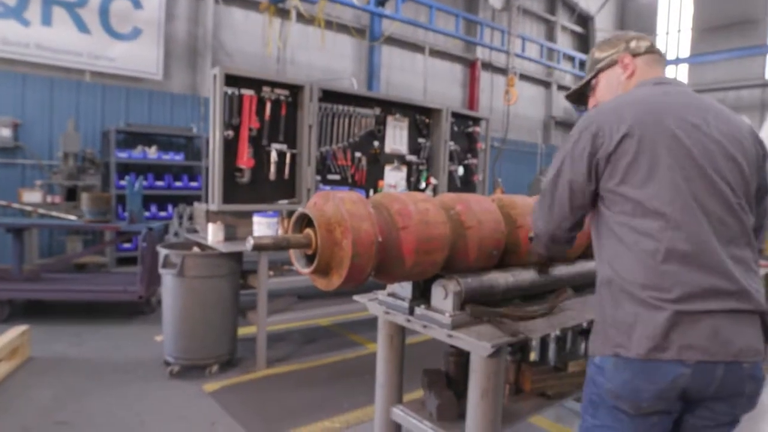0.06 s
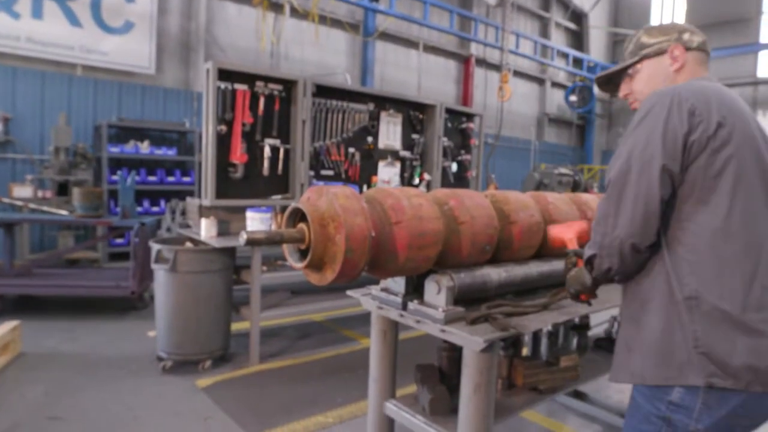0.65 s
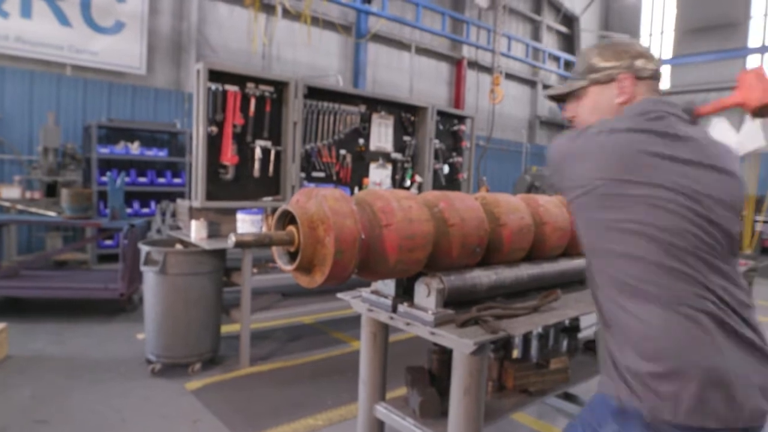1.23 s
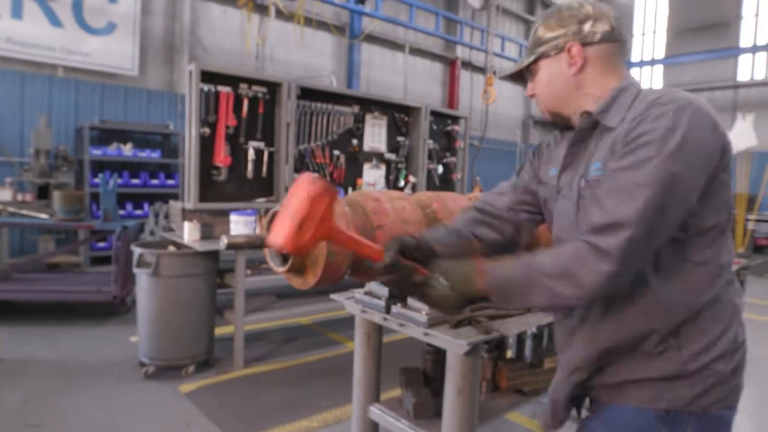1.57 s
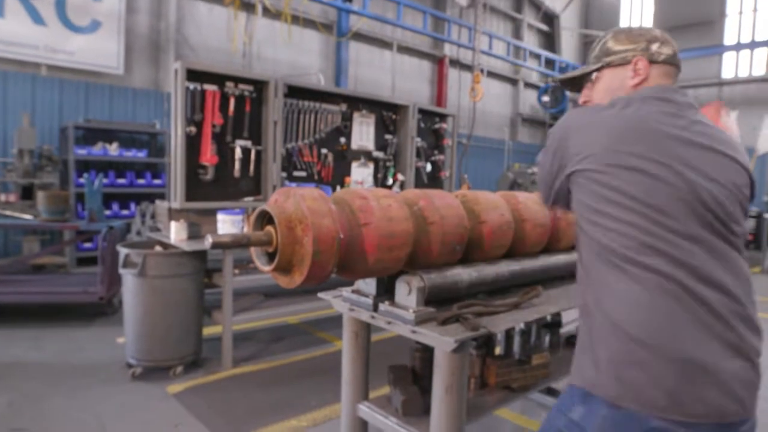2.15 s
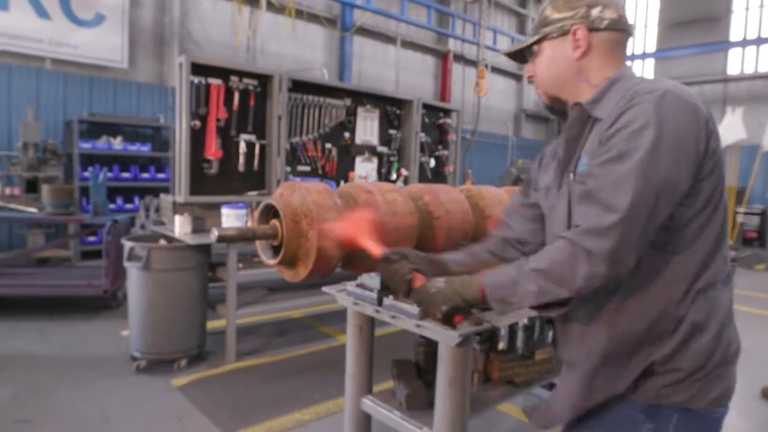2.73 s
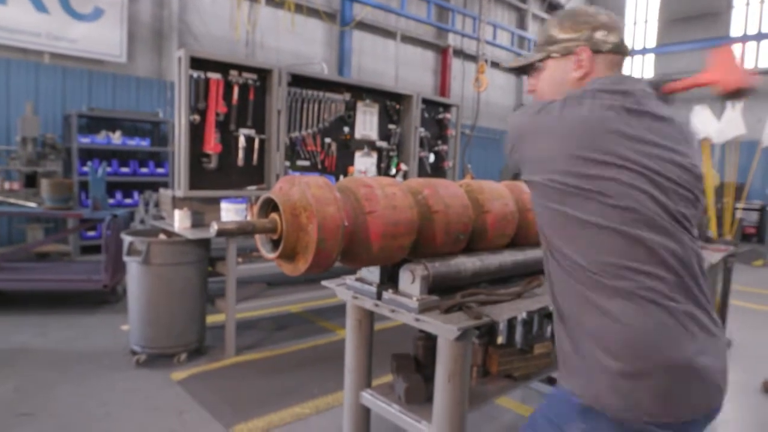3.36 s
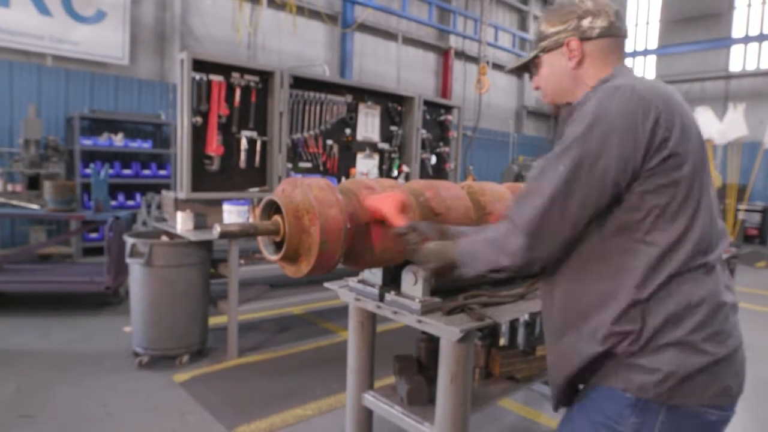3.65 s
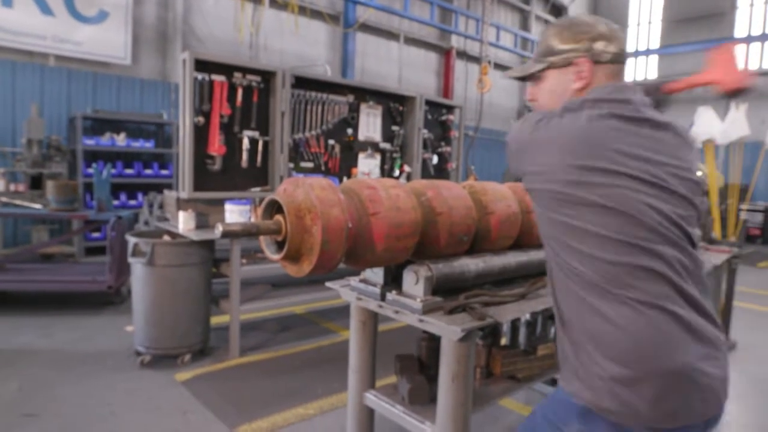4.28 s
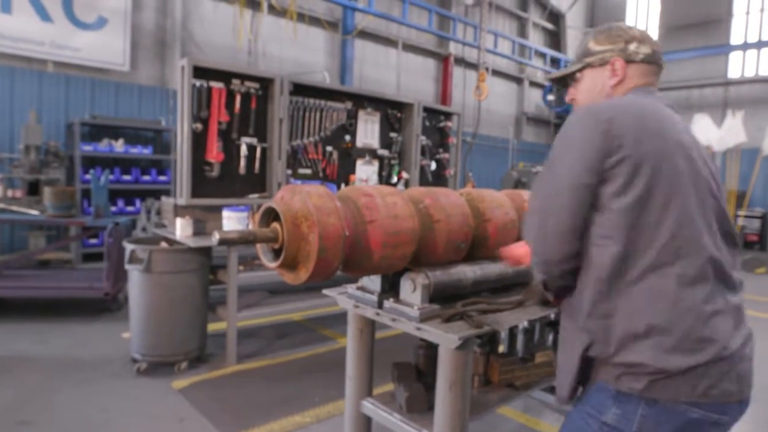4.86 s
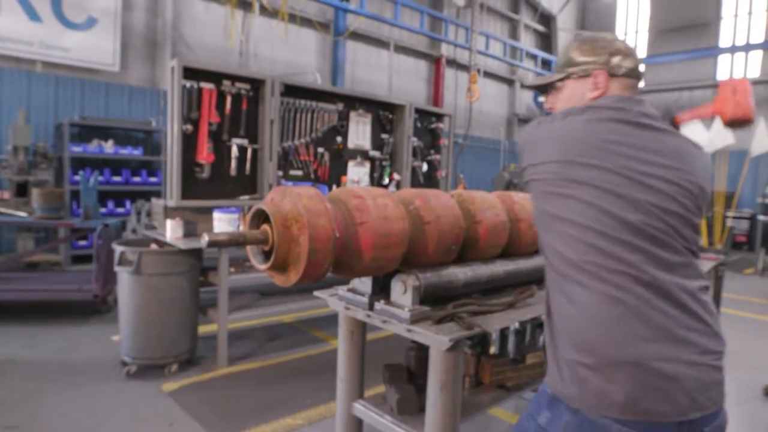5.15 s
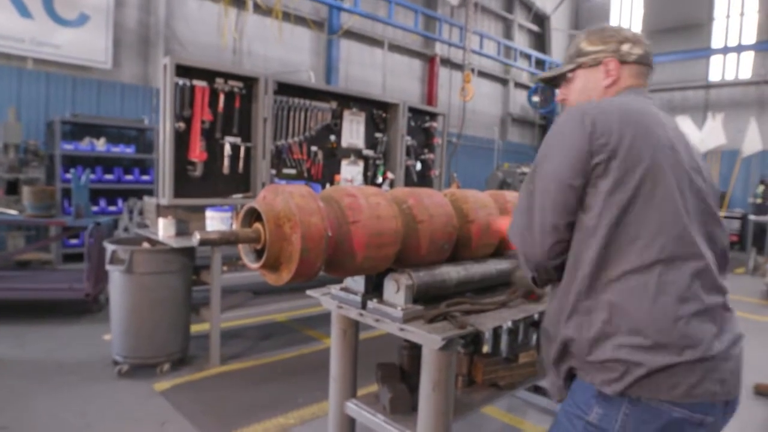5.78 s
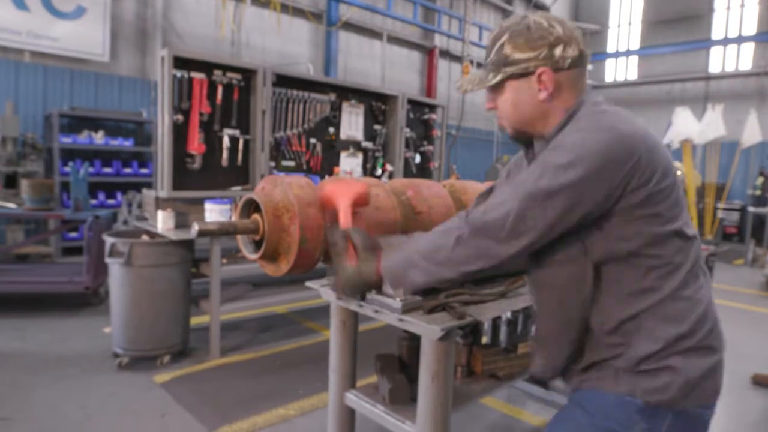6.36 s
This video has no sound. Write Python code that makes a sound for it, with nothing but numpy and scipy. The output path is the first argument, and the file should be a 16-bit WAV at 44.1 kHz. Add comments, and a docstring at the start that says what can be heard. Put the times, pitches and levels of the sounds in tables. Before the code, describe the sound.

A hammer strikes a heavy iron pump six times, sharp knocks with a brief ring, over a low ventilation hum in a large workshop.

```python
"""A dead-blow hammer strikes a long cast-iron pump six times in a large repair shop.
Each blow is a knock with a sharp crack; loose shot in the head drives a second contact a few ms later.
The casing rings briefly and the bench shudders. Bench, floor and tool wall scatter the sound,
the hall rings on, and ventilation hums underneath."""
import sys
import numpy as np
from scipy import signal
from scipy.fft import rfft, irfft, next_fast_len
from scipy.io import wavfile
from scipy.ndimage import map_coordinates

SR = 44100
rng = np.random.default_rng(int(sys.argv[2]) if len(sys.argv) > 2 else 0)


def file_out(sig):
    """Save sig as 16-bit WAV at sys.argv[1]."""
    # one column per channel
    cols = np.atleast_2d(sig).T
    # limit, then scale
    lim = np.clip(cols, -1, 1)
    pcm = np.round(lim * 32767).astype(np.int16)
    wavfile.write(sys.argv[1], SR, pcm)


N = 282681

# Contact crack and shot rattle. Each row: frequency in Hz, relative level in dB.
CRACK_SPECTRUM = [(400, -34), (1200, 2.5), (2400, 8), (3100, -2), (4000, -2), (5300, -0.5), (7200, -8),
                  (9300, -4), (12000, -12.5), (16000, -26)]


def hammer(push_db=-2, rattle_db=-22.5):
    """Six blows, each a push split over two contacts that excites casing, bench and room."""
    # Each row: start in seconds, force in dB, knock pitch in Hz, hardness in dB, head clack in dB,
    # lag of the second contact in seconds, its share of the push from 0 to 1.
    blows = [(1.458, -.3, 1040, 6, -4, .0057, 0.54), (2.5651, -.5, 1030, 0, -11, .0040, 0.73),
             (3.5647, 0.1, 550, -4, -17, .0052, 0.21), (4.4822, 1.5, 625, -2.5, -4.5, .0045, 0.17),
             (5.4475, -.4, 613, -3, -33, .0058, 0.23), (6.386, 1.5, 553, 1.5, -7.5, .0052, 0.19)]
    track = np.zeros(N)
    t = np.arange(SR * 3 // 2) / SR
    for start_s, force_db, knock_hz, hardness_db, clack_db, lag_s, share in blows:
        force = amp(force_db)
        first, second = force * amp(push_db) * np.array([1 - share, share])
        add(track, start_s, first * contact(t, knock_hz, hardness_db))
        clack = amp(clack_db) * knock(t, hz=1383, peak_cycles=0.74)  # hollow head
        add(track, start_s, force * clack)
        # The shot follows and drives the face on again.
        add(track, start_s + lag_s, second * contact(t, hz=678, hardness_db=hardness_db))
        add(track, start_s + lag_s, second * amp(rattle_db + hardness_db) * shot_rattle(t))
        add(track, start_s, force * casing(t))
        add(track, start_s + 0.0091, force * bench(t))  # the heavy pump is slow to rock it
        # Harder contact brightens the room.
        add(track, start_s, force * shop(t, tilt_db_per_oct=1 + 0.1 * hardness_db))
    return track


def contact(t, hz, hardness_db, crack_db=-12.5):
    """Face on iron: knock plus crack, both shorter at higher pitch. Harder contact cracks louder."""
    crack = swell(t, peak_s=0.44 / hz) * noise(CRACK_SPECTRUM, len(t))
    return knock(t, hz, peak_cycles=0.58) + amp(crack_db + hardness_db) * crack


def knock(t, hz, peak_cycles):
    """A push a few cycles long."""
    return swell(t, peak_cycles / hz) ** 2 * np.sin(2 * np.pi * hz * t)


def shot_rattle(t):
    """Loose shot settles in the head: a short noise burst."""
    return swell(t, peak_s=0.0032) * noise(CRACK_SPECTRUM, len(t))


def casing(t):
    """The cast-iron pump casing rings briefly."""
    # Each row: frequency in Hz, relative level in dB, T60 in seconds.
    casing_modes = [(243, -9, .2), (303, 2.5, .2), (495, -11, .3), (614, -7, .22), (923, -9, .17),
                    (1108, -13, .3), (1208, -7, .25), (1400, -14, .25), (1530, -12, .15), (1600, -17, .3),
                    (1890, -19, .22), (2488, -22, .3), (2611, -27, .35), (3010, -26, .3), (3156, -26, .35),
                    (3494, -27, .56), (3745, -26, .42)]
    return amp(-20) * ring(t, casing_modes, rise_s=0.0012, spread_db=2.0)


def bench(t):
    """The steel bench shudders under the pump."""
    # Each row: frequency in Hz, relative level in dB, T60 in seconds.
    bench_modes = [(42.7, -6.5, 0.3), (61.4, -0.5, 0.3), (83.3, -9, 0.45), (111.5, -5, 0.19),
                   (156, -9, 0.15)]
    return amp(-27) * ring(t, bench_modes, rise_s=0.008, spread_db=4.0)


def shop(t, tilt_db_per_oct):
    """Dense echoes off bench and floor, a bright cluster off the tool wall, then the hall's slow tail."""
    # Each row: frequency in Hz, relative level in dB.
    scatter_spectrum = [(100, -39), (190, -15), (260, -9), (400, -6), (600, -5.5), (900, -8.5), (1300, -8),
                        (2000, -20), (3000, -22), (4500, -32), (7500, -34.5), (9500, -40), (12000, -42),
                        (16000, -62)]
    wall_spectrum = [(300, -29), (600, 4), (1300, 5.5), (2000, -1.5), (2800, 0.5), (3800, -6),
                     (5000, -15.5), (9500, -41), (16000, -48)]
    hall_spectrum = [(88, -46), (150, -5.5), (172, 4.5), (197, -10.5), (226, 0), (398, -11), (601, -3),
                     (662, -4.5), (1500, -12), (5150, -28), (9260, -35), (16000, -56)]
    # Each row: frequency in Hz, T60 in seconds.
    scatter_t60 = [(200, 0.37), (1000, 0.22), (4000, 0.13), (12000, 0.12)]
    hall_t60 = [(150, 0.9), (500, 0.85), (1500, 1.13), (4000, 1.1), (8000, 0.5), (14000, 0.54)]
    scatter = decay(noise(scatter_spectrum, len(t), tilt_db_per_oct), scatter_t60)
    scatter *= onset(t, rise_s=0.0035)
    wall = swell(t - 0.016, peak_s=0.018) ** 4 * noise(wall_spectrum, len(t), tilt_db_per_oct)
    hall = decay(noise(hall_spectrum, len(t), tilt_db_per_oct), hall_t60)
    hall *= onset(t, rise_s=0.026)
    return amp(-20.5) * scatter + amp(-28) * wall + amp(-29) * hall


def ventilation(drift_cycles=0.22, waver_db=0.5):
    """Fans: wavering tones over a steady rush of air and duct rumble."""
    # Each row: frequency in Hz, amplitude in dB.
    fan_tones = [(124.7, -43.5), (250, -59.5), (333.8, -59.5), (377, -60), (500.6, -59.5), (629.8, -63),
                 (882.9, -60), (1136, -62)]
    # Each row: frequency in Hz, relative level in dB.
    air_spectrum = [(100, -8), (170, -2.5), (210, -7), (350, -5.5), (420, -11), (520, -6), (720, -9),
                    (1000, -8.5), (1500, -14.5), (2500, -20.5), (4200, -26), (7000, -33.5), (10500, -37.5),
                    (16000, -53)]
    rumble_spectrum = [(15, -41), (30, 0), (45, 1.5), (65, 2), (90, -1.5), (150, -3), (200, -29),
                       (400, -68.5)]
    t = np.arange(N) / SR
    hum = np.zeros(N)
    for hz, level_db in fan_tones:
        gain = amp(level_db + waver_db * wobble(knots_per_s=7.6))
        phase_cycles = hz * t + drift_cycles * wobble(knots_per_s=4)
        hum += gain * np.sin(2 * np.pi * phase_cycles)
    return hum + amp(-47) * noise(air_spectrum, N) + amp(-48.5) * noise(rumble_spectrum, N)


def ring(t, modes, rise_s, spread_db):
    """Damped modes, strengths redrawn for each blow."""
    hz, level_db, t60_s = np.transpose(modes)[:, :, None]
    gain = amp(level_db + spread_db * rng.standard_normal(hz.shape))
    partials = gain * np.exp(-np.log(1000) * t / t60_s) * np.sin(2 * np.pi * hz * t)
    return partials.sum(axis=0) * onset(t, rise_s)


def noise(spectrum, size, tilt_db_per_oct=0):
    """Coloured noise, rms 1."""
    hz = np.fft.rfftfreq(size, 1 / SR)
    gain = amp(along(spectrum, hz) + tilt_db_per_oct * np.log2(hz + 1))
    x = irfft(gain * np.exp(2j * np.pi * rng.random(len(hz))), size)
    return x / np.sqrt(np.mean(x ** 2) + 1e-20)


def decay(x, t60_curve):
    """Fade each frequency at its own T60."""
    hz, t, bins = signal.stft(x, SR, nperseg=256)
    fade = np.exp(-np.log(1000) * t / along(t60_curve, hz)[:, None])
    return signal.istft(bins * fade, SR, nperseg=256)[1][:len(x)]


def swell(t, peak_s):
    """Envelope: 0 to 1 at peak_s, then falling."""
    u = np.maximum(t, 0) / peak_s
    return u * np.exp(1 - u)


def onset(t, rise_s):
    """Exponential rise towards 1."""
    return 1 - np.exp(-t / rise_s)


def wobble(knots_per_s):
    """Smooth random curve."""
    knots = rng.standard_normal(int(N * knots_per_s / SR) + 4)
    return map_coordinates(knots, [np.arange(N) * knots_per_s / SR])


def along(points, hz):
    """Interpolate (Hz, value) points on a log axis."""
    point_hz, values = np.transpose(points)
    return np.interp(np.log(hz + 1), np.log(point_hz + 1), values)


def amp(db):
    """dB to gain."""
    return 10 ** (np.asarray(db) / 20)


def add(track, start_s, sound):
    """Mix a sound into the track."""
    part = track[round(start_s * SR):][:len(sound)]
    part += sound[:len(part)]


def scene():
    """Hammer over ventilation, mono."""
    return (hammer() + ventilation())[None]


def record(dry, ceiling=0.7, cutoff_hz=15900):
    """Soft peak limiter, then a brick-wall low-pass."""
    limited = dry / (1 + np.abs(dry / ceiling) ** 8) ** (1 / 8)
    size = next_fast_len(N + SR // 2)
    passband = np.fft.rfftfreq(size, 1 / SR) < cutoff_hz
    return irfft(rfft(limited, size) * passband, size)[:, :N]


dry = scene()
out = record(dry)
file_out(out)
```